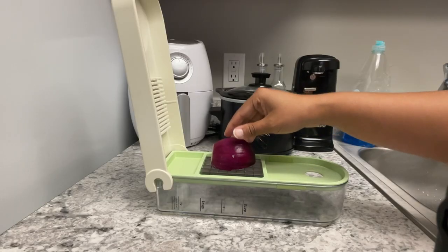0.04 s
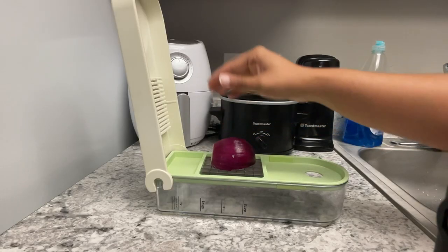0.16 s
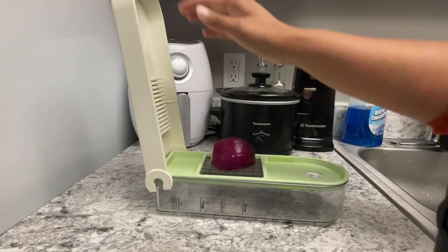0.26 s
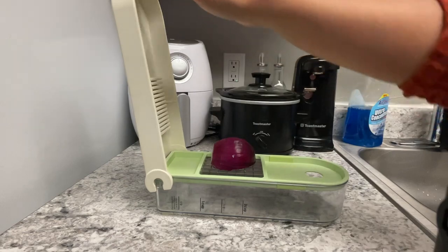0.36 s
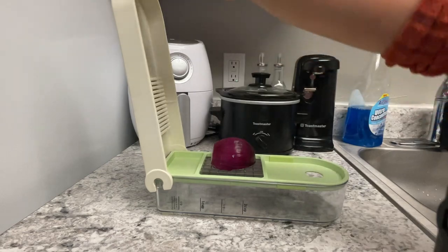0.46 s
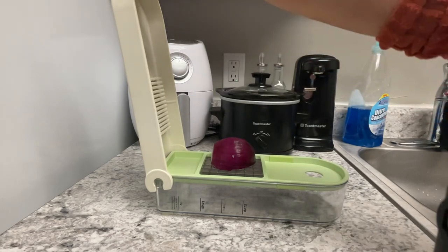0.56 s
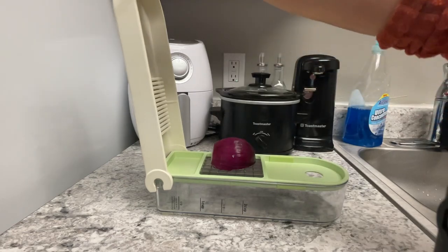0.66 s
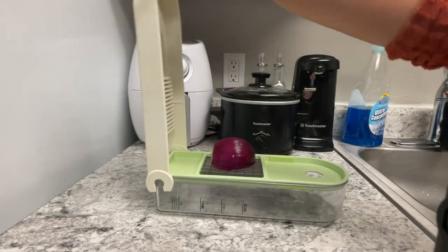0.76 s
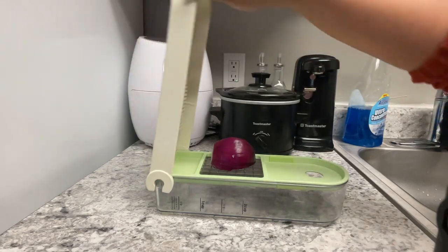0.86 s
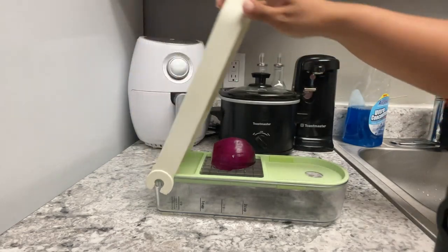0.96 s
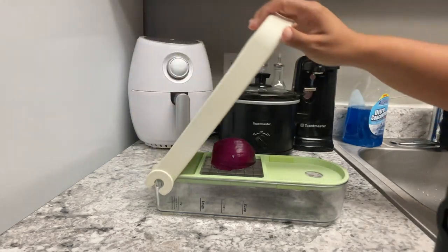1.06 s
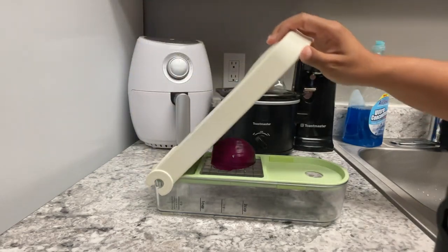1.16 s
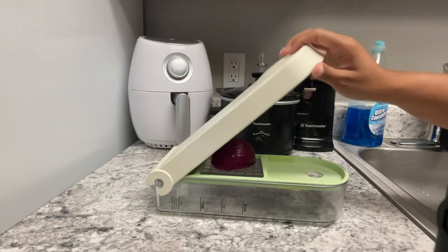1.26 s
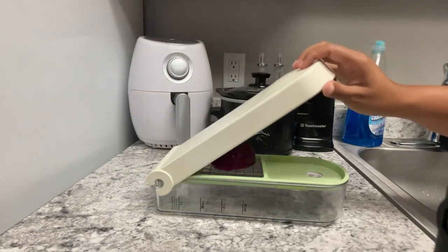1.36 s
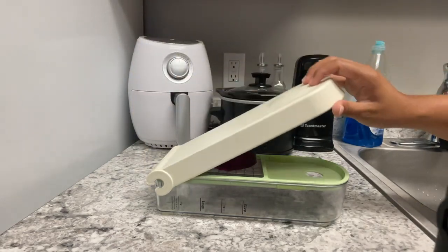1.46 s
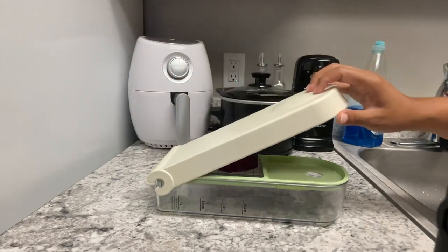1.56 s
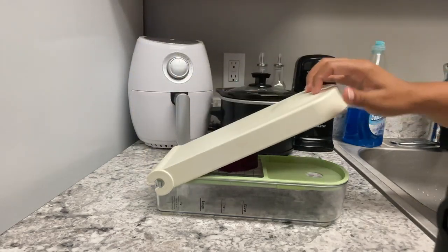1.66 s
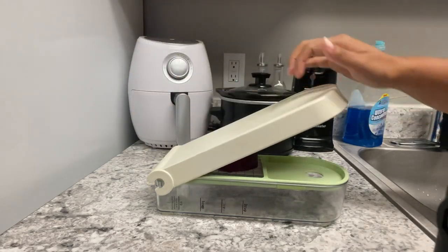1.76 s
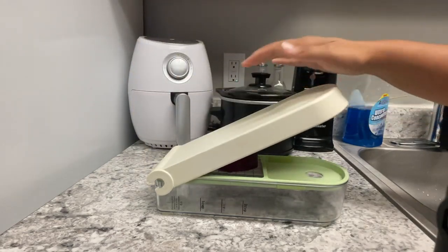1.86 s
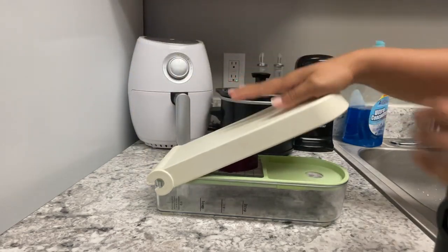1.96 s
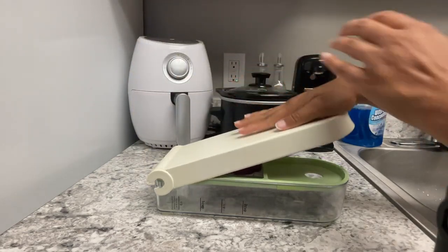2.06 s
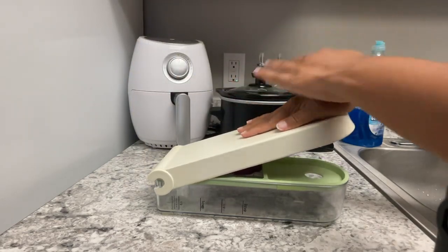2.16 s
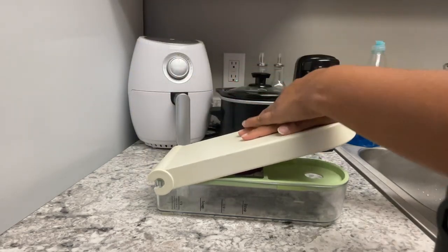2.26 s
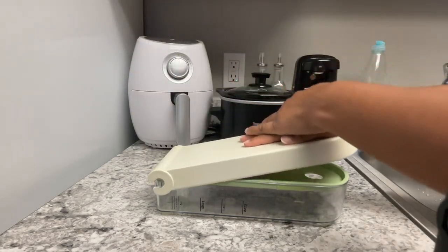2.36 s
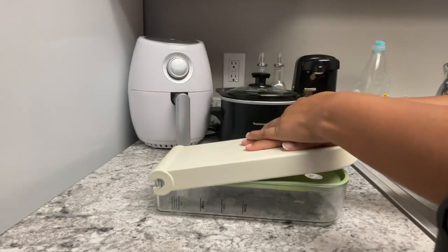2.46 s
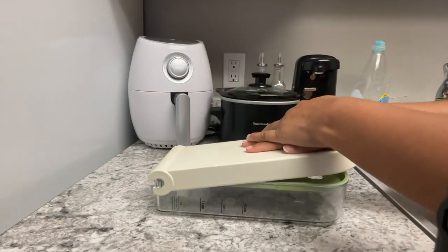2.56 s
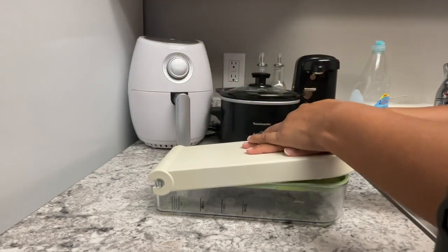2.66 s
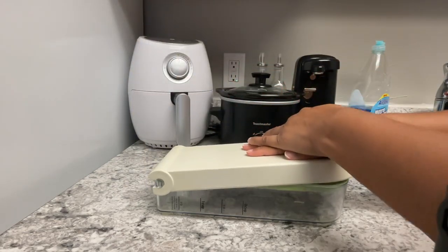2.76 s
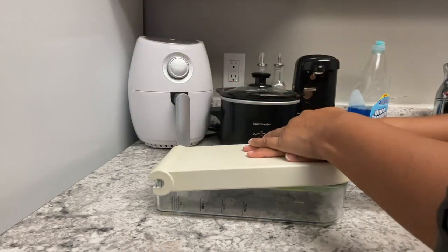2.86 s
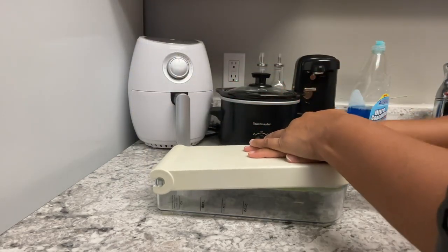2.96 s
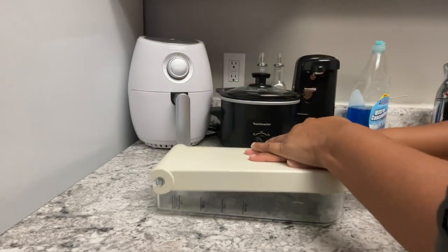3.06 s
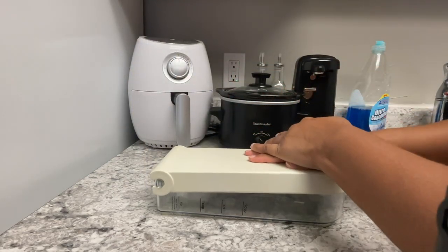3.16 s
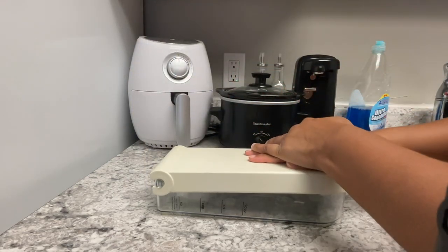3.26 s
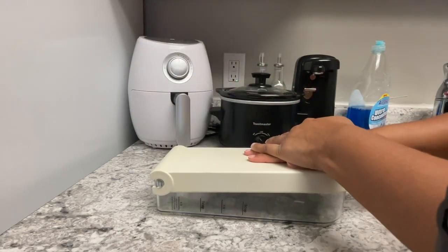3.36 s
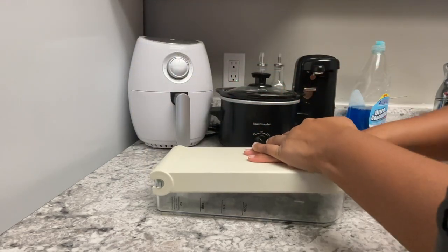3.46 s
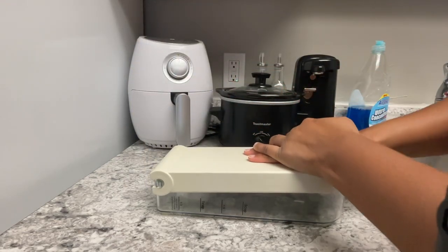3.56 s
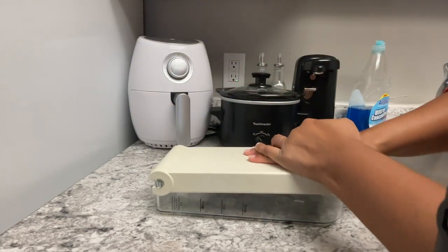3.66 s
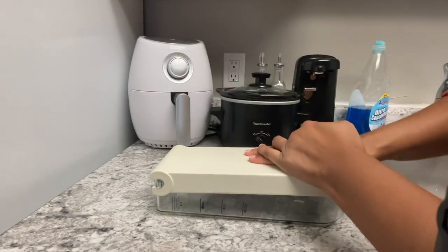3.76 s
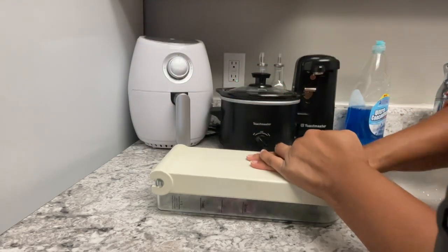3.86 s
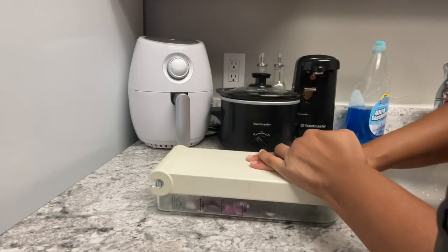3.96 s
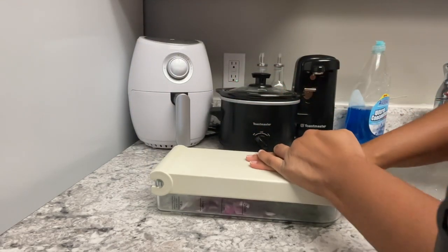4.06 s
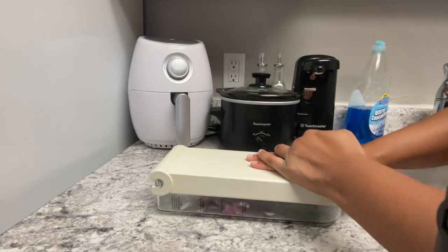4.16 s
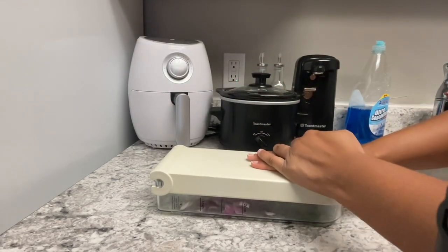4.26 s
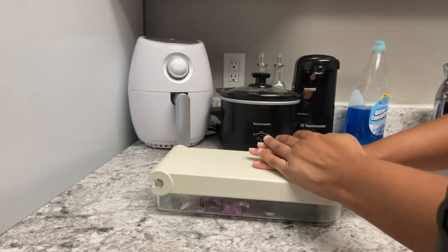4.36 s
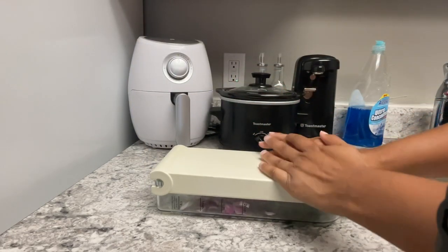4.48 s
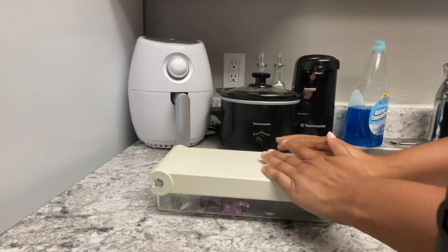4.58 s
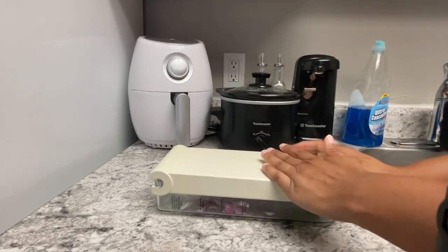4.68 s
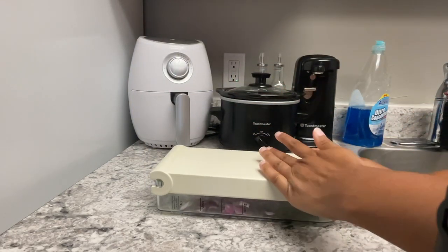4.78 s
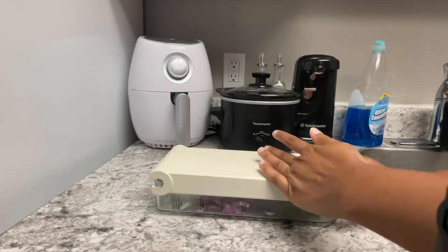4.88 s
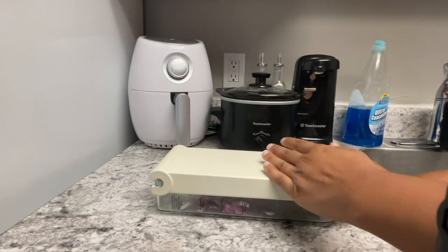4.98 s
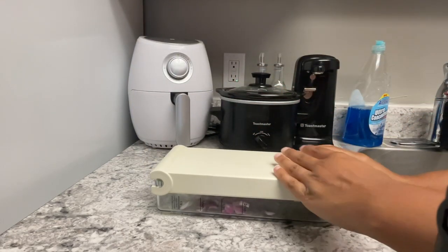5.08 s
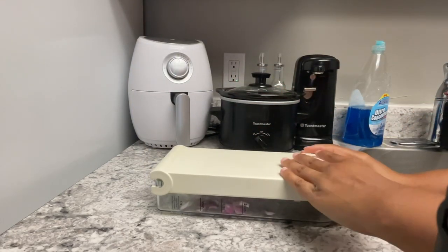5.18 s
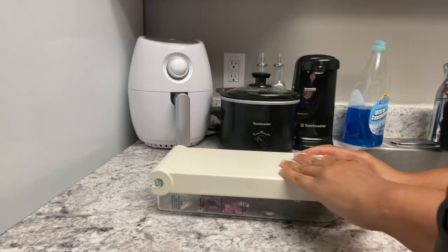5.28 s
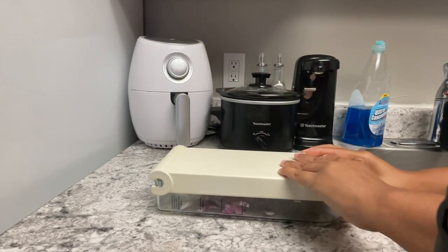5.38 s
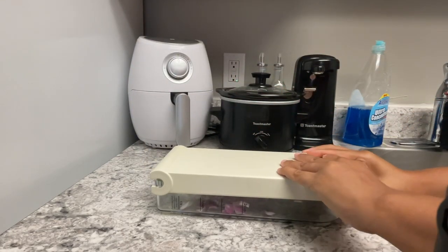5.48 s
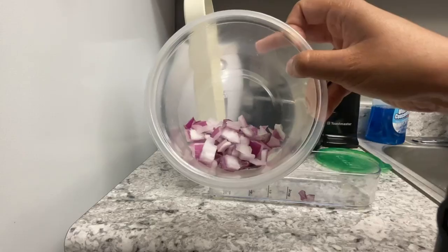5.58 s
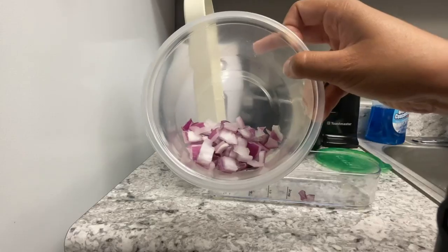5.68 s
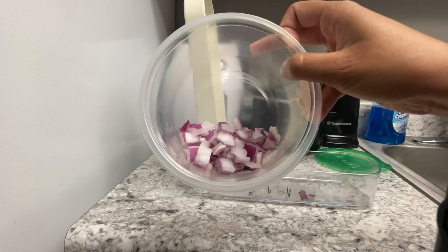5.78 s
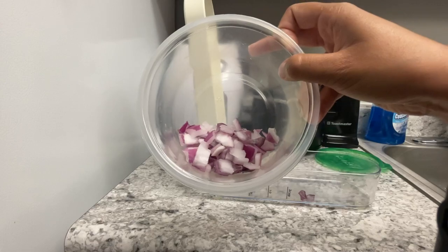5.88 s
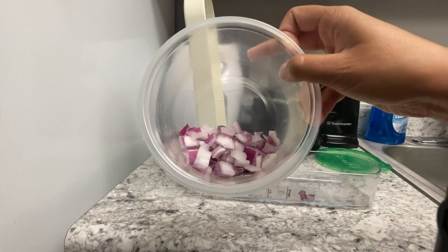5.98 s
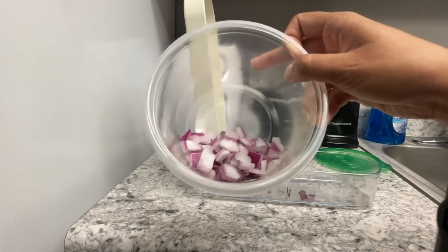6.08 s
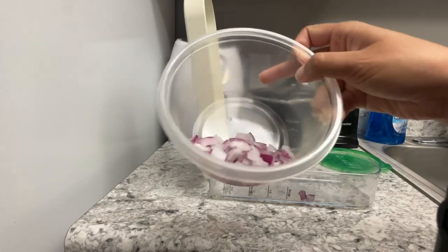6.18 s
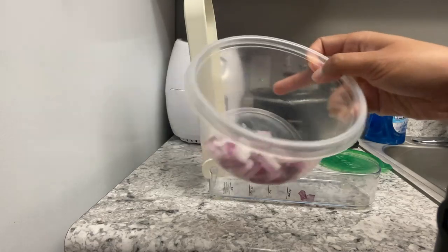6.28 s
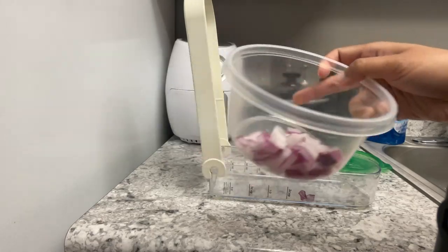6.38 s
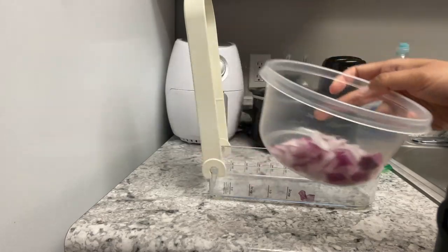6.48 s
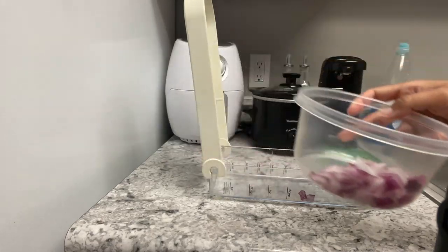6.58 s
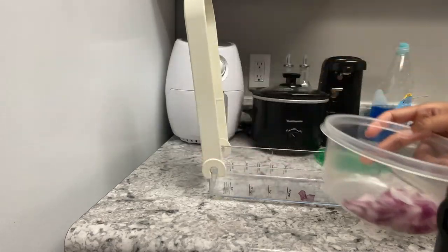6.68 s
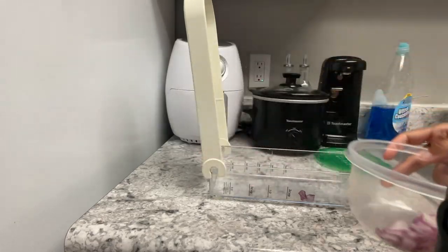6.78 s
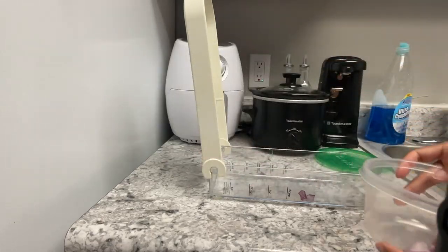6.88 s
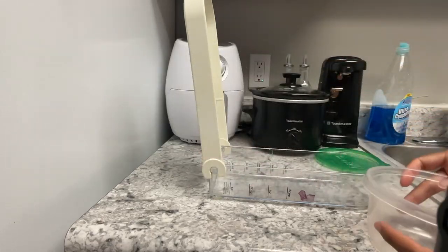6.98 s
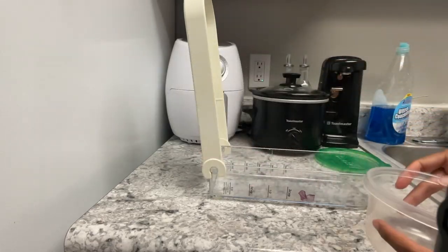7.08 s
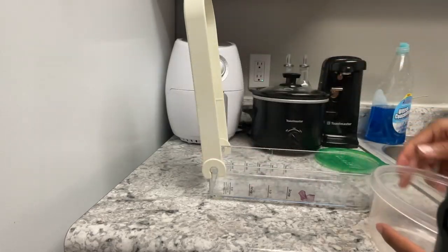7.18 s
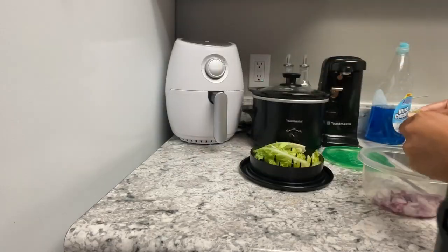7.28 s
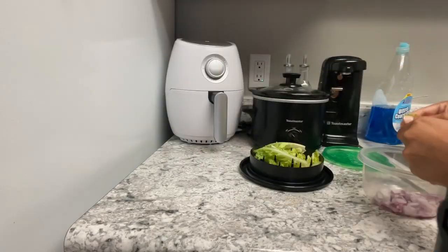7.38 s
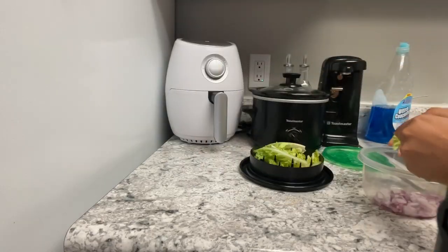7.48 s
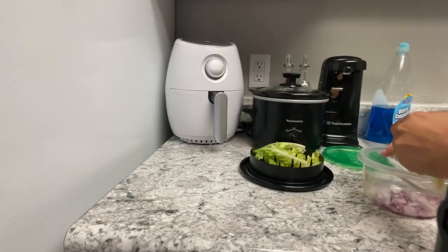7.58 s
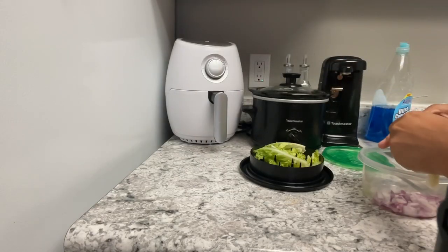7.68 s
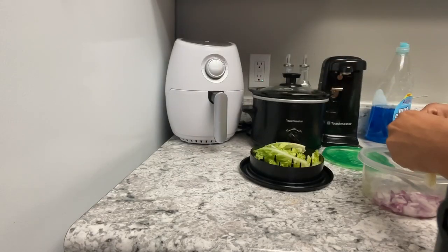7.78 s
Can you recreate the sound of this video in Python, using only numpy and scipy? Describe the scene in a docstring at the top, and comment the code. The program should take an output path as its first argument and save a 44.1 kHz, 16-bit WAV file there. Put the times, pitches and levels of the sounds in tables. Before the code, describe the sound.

In a small hard-surfaced kitchen, a low appliance hum throbs slightly to the left. Close to the microphone, a plastic lid rattles and knocks on its hinge, then presses an onion through blades with wet crunches, snaps and hollow groans. It bangs down, then a second push ends in a louder slam. Hands slide, diced pieces tumble and rustle softly, and the sound cuts out briefly twice.

```python
"""First a low appliance hum beats on the left, over dull kitchen air; a thin whine comes and goes.
Close up on the counter, a plastic chopper's lid swings and knocks, an onion tears layer by layer in its
blade grid, and the lid slams home with a thump. Hands slide off the lid and pieces rustle in a tub.
Motors are sines and wavering tones; contacts ring plastic modes and noise; movements are shaped noise
or streams of tiny contacts; hard kitchen surfaces return a tail. The sound drops out briefly twice."""
import sys
import numpy as np
from scipy import signal
from scipy.io import wavfile
from scipy.ndimage import uniform_filter1d

SR = 44100
rng = np.random.default_rng(int(sys.argv[2]) if len(sys.argv) > 2 else 0)


def output_pcm(signal):
    """Save a mono or channel-first signal as 16-bit PCM at the path in sys.argv[1].

    Samples are clipped to [-1, 1] before scaling.
    """
    pcm = np.clip(np.atleast_2d(signal).T, -1, 1) * 32767
    wavfile.write(sys.argv[1], SR, np.round(pcm).astype(np.int16))


N = 345303
TIME = np.arange(N) / SR
RING = TIME[:SR // 4]   # time axis of one contact
ATTACK = SR // 40   # samples over which a contact's level is set

# Table levels are relative: the functions add their own trims, stereo lean and room.
# Room air: pitch_hz [Hz], density_db [dB per Hz]
AIR_SPECTRUM = [(25, -37), (60, -13.5), (85, -8.5), (120, -22.5), (200, -12), (400, -16), (620, -24),
                (900, -26), (1600, -32.5), (2400, -44), (3500, -56), (6000, -56), (10000, -64.5),
                (14000, -79)]
# Wavering motor tones, each spread over a width: pitch_hz [Hz], level_db [dB], width_hz [Hz]
MOTOR_TONES = [(54.8, -60, 5.3), (210.7, -64, 5.5), (250.4, -62.5, 3.1), (344.6, -63, 9.9),
               (373.5, -63.5, 16), (491.6, -64.5, 5.5), (757, -66.5, 19), (934, -68, 24), (1174, -67, 22),
               (9400, -93.5, 120)]
# Rise and fall of the thin electrical whine: time_s [s], level_db [dB]
WHINE_LEVEL = [(0, -100), (1.1, -92), (1.25, -83.5), (1.9, -81), (4.8, -83.5), (5.5, -84), (5.6, -97),
               (7.83, -99)]
# Partials of the whine: pitch_hz [Hz], level_db [dB], waver_hz [Hz]
WHINE_PARTIALS = [(5394, -0.5, 8), (6815, -11.5, 10)]
# Likeness of the two sides: pitch_hz [Hz], correlation [-1 to 1]
SIDE_LIKENESS = [(60, 0.79), (130, 0.52), (250, 1), (500, -0.59), (1000, 0.72), (2500, -0.028),
                 (6000, -0.094), (12000, 0.055)]
# Stereo balance: pitch_hz [Hz], left_minus_right_db [dB]
STEREO_LEAN = [(60, 1), (130, 5.5), (300, -1.5), (500, 5.5), (1100, 5), (2200, 3), (4500, 7), (8000, 0.5),
               (13000, -3.5)]
# Kitchen reflections: pitch_hz [Hz], density_db [dB]
ROOM_SPECTRUM = [(50, -3.5), (150, -15.5), (450, 5.5), (1500, 0.5), (5000, -3), (8000, 8), (11000, 7.5),
                 (15000, -4)]
# Decay of the kitchen: pitch_hz [Hz], t60_s [s]
ROOM_DECAY = [(70, 1), (250, 0.4), (1000, 0.3), (5000, 0.42), (8000, 0.24), (11000, 0.15), (14000, 0.28)]
# Moments without sound: start_s [s], end_s [s]
DROPOUTS = [(5.532, 5.583), (7.192, 7.243)]

# Modes of counter, box and lid: pitch_hz [Hz], level_db [dB], t60_s [s]
BOX_MODES = [(73.27, 3.5, 0.047), (99.7, -2, 0.22), (139, -3.5, 0.16), (228.3, 3.5, 0.11), (303, 3.5, 0.21),
             (335.2, -1, 0.13), (440.6, -6, 0.033), (515, -5, 0.028), (663, -16, 0.29), (794, -9.5, 0.082),
             (1050, 4.5, 0.011), (1235.5, -8.5, 0.034), (1612, -5, .06), (1920, -7.5, 0.033),
             (2103, -15.5, 0.05), (2444, -10.5, 0.069)]
# Dense overtones of the plastic: pitch_hz [Hz], density_db [dB per Hz]
PLASTIC_SPECTRUM = [(40, -18), (100, -4), (300, 2.5), (470, -1.5), (750, -6.5), (1000, -1), (1400, -5),
                    (1950, -7), (2700, -2.5), (3600, -12), (5800, -9.5), (8000, -18), (12000, -8),
                    (15500, -32)]
# Decay of those overtones: pitch_hz [Hz], t60_s [s]
PLASTIC_DECAY = [(80, 0.25), (400, 0.091), (1500, 0.02), (5000, 0.04), (13000, 0.029)]
# Modes of the hollow container, before damping: pitch_hz [Hz], level_db [dB], t60_s [s]
CONTAINER_MODES = [(347.3, -12.5, 0.088), (457.4, 2, 0.045), (811, -4, 0.05), (1150, -14, 0.026),
                   (1590, -10.5, 0.025), (2400, -20, 0.02)]
# Modes of the worktop, before damping: pitch_hz [Hz], level_db [dB], t60_s [s]
WORKTOP_MODES = [(76, -6, 0.088), (92, -2, 0.099), (127, -3, 0.25), (146, -2, 0.24), (232, 5.5, 0.17),
                 (303, -6.5, 0.26), (344, 5, 0.086), (498, -10.5, 0.42)]
# Air and wall notes of the container: pitch_hz [Hz], boost_db [dB], sharpness_q [Q]
HOLLOW_NOTES = [(385, 12.5, 12), (419.7, 14.5, 9.7), (462, 13, 18), (1190, -1, 9.6), (1506, -7, 22),
                (1865, 1, 26)]
# Notes of groups of nearly equal blades: pitch_hz [Hz], level_db [dB]
BLADE_NOTES = [(805, -1), (1230, -4.5), (1320, -1.5), (1415, 0.5), (1580, -2.5), (1690, 0), (1900, 5),
               (2115, -4.5), (2420, -0.5), (2850, -8), (3350, -13)]
# Bands of thump, box, shell and crack, in that order: low_hz [Hz], high_hz [Hz]
ZONE_BANDS = [(45, 260), (270, 620), (620, 2400), (2400, 16000)]

# Sliding hiss and wet ticks: pitch_hz [Hz], density_db [dB per Hz]
RUSTLE_SPECTRUM = [(1650, 3.5), (2800, -3), (4510, 1), (5230, -2), (8920, -3), (11700, -13), (14000, -7)]
# Skin and onion sliding on plastic: peak_s [s], level_db [dB], rise_s [s], fall_s [s]
SLIDE_STROKES = [(0.72, -66.5, 0.16, 0.19), (0.95, -65, 0.19, 0.22), (1.525, -52, 0.075, 0.04),
                 (3.111, -45.5, .05, 0.22), (3.35, -74, 0.22, 0.76), (3.741, -44.5, 0.13, 0.3),
                 (4.06, -58, 0.23, 0.12), (4.489, -50.5, 0.14, 0.21), (4.65, -69, 0.18, 0.21),
                 (4.77, -72, 0.16, 0.044), (4.97, -75.5, 0.062, 0.57), (6.37, -69.5, 0.069, 0.11),
                 (6.46, -73, 0.063, 0.11), (7.125, -55.5, 0.11, 0.046), (7.247, -44.5, 0.025, 0.088),
                 (7.55, -67, 1.3, 4.7)]
# Small wet ticks of onion pieces: start_s [s], level_db [dB]
WET_TICKS = [(1.535, -29.5), (3.268, -33.5), (3.32, -32), (3.482, -31), (4.151, -33), (6.95, -40),
             (7.0425, -36.5), (7.2435, -33.5), (7.2622, -23), (7.46, -42), (7.6, -38.5), (7.787, -43)]
# Faint fingers on plastic: peak_s [s], level_db [dB], rise_s [s], fall_s [s], pitch_hz [Hz]
FINGER_SQUEAKS = [(0.5, -85, 0.12, 0.3, 7400), (0.6, -72.5, 0.15, 0.5, 5280),
                  (6.38, -79.5, 0.06, 0.06, 6900), (6.43, -80, 0.22, 0.15, 4300)]
# Swing of the hinge: level_db [dB], rise_s [s], fall_s [s]
HINGE_SWING = (-53, 0.28, 0.26)
# Diced onion tumbling into the container: level_db [dB], rise_s [s], fall_s of the thudding [s]
DICE_TUMBLE = (-36.5, 0.35, 0.35)
# Soft taps on the hollow container: start_s [s], level_db [dB]
CONTAINER_TAPS = [(3.485, -33), (3.609, -21.5)]
# Blade grid set rattling by firm knocks: start_s [s], level_db [dB]
GRID_RATTLES = [(0.75, -51.5), (1.48, -45), (3.856, -22), (4.814, -60)]
# Lid knocks: start_s [s], shell level_db [dB], weight_db [dB], crack_to_shell_db [dB], pitch_hz [Hz]
LID_KNOCKS = [(0.664, -51.5, 6, -13, 650), (0.737, -41, -10, -45, 900), (0.749, -33, -1, -28.5, 660),
              (0.867, -48.5, -1, -49, 766), (1.003, -46.5, -7, -53, 930), (1.407, -45, -2, -53, 920),
              (1.478, -33, -2, -23, 880), (2.226, -39, -21, -13.5, 626), (3.088, -20, 6, -25, 901),
              (3.853, -18, 2.5, -3, 1980), (3.863, -19.5, 1, -4, 1610), (4.812, -41, -1, -31, 1840)]
# A landing hand or a stopped lid thuds the box: start_s [s], level_db [dB], lowest_hz shaken [Hz]
BOX_THUDS = [(2.054, -32.5, 83), (2.313, -31.5, 111), (3.097, -16, 125), (3.862, -19, 80)]
# The chopper driven into the counter: start_s [s], level_db [dB], lowest_hz shaken [Hz]
COUNTER_SLAMS = [(3.092, -9.5, 128.7), (3.856, -6.5, 62)]
# First, slow push through the grid: time_s [s], crunch_db [dB], juice_spray_db [dB]
SLOW_PUSH = [(1.97, -57, -54), (2.026, -32.5, -36.5), (2.184, -74, -71), (2.234, -38, -41),
             (2.28, -41.5, -51), (2.29, -44, -31), (2.308, -36, -41.5), (2.388, -27, -31),
             (2.488, -50.5, -50.5), (2.536, -31, -37.5), (2.706, -44, -41.5), (2.714, -28, -31),
             (2.872, -45.5, -43), (2.954, -43.5, -41), (2.964, -29.5, -42), (3.008, -35, -36.5),
             (3.04, -24, -33), (3.06, -22.5, -25), (3.078, -20.5, -27), (3.084, -31.5, -41),
             (3.1, -26.5, -55)]
# Second push, driving the rest through: time_s [s], crunch_db [dB], juice_spray_db [dB]
FINAL_PUSH = [(3.7, -51, -63), (3.82, -44, -52), (3.83, -32.5, -27.5), (3.84, -30.5, -30),
              (3.858, -11, -14.5)]
# Pitch range of single fibres snapping: low_hz [Hz], high_hz [Hz]
FIBRE_RANGE = (842, 4500)
# Container groans: peak_s [s], level_db [dB], rise_s [s], fall_s [s], pitch_hz [Hz]
CONTAINER_GROANS = [(2.373, -19.5, 0.022, 0.094, 437), (2.404, -25, 0.013, 0.058, 456),
                    (2.535, -27.5, 0.018, 0.067, 400), (2.572, -28, 0.05, 0.11, 420),
                    (2.772, -25, 0.08, 0.077, 391), (2.97, -27.5, 0.022, 0.11, 350),
                    (3.07, -22, 0.062, 0.075, 454)]
# Band of the groans: low_hz [Hz], high_hz [Hz]
GROAN_BAND = (320, 560)
# Onion layers tearing, and a last onion piece dropping with a thin tick at 4.07 s:
# start_s [s], snap level_db [dB], boom_to_snap_db [dB], crack_to_snap_db [dB], pitch_hz [Hz]
TEARS_AND_DROP = [(1.985, -45, 11, 0, 930), (2.023, -41, 12.5, 3, 2430), (2.288, -21, -9.5, -10.5, 990),
                  (2.36, -23, 8, -4.5, 1070), (2.387, -20.5, 2, -13, 800), (2.524, -28.5, 1, -9, 1950),
                  (2.599, -31.5, -6, -5, 1920), (2.631, -24, -4.5, -22, 1150),
                  (2.661, -40, -31, -1.5, 1900), (2.671, -30.5, -25, -3, 3080), (2.698, -33, -16, -8, 1230),
                  (2.714, -19, -16, -14, 1170), (2.769, -28.5, 1, -6, 1170), (2.962, -22, -7, -19, 1250),
                  (2.981, -30, -21.5, 4, 3500), (3.041, -30, -10, -2, 2000), (3.059, -17, -7, -15, 1450),
                  (3.074, -20.5, -3, -9, 1230), (3.831, -30, -14.5, -3.5, 1860),
                  (4.07, -40, 1.5, -5.5, 3260)]

# Half-octave filter bank, and the four zones of the box
EDGES = 22 * 2 ** np.arange(0, 9.6, .5)
BANK = [signal.butter(2, pair, "band", fs=SR, output="sos") for pair in zip(EDGES, EDGES[1:])]
ZONES = [signal.butter(order, pair, "band", fs=SR, output="sos")
         for order, pair in zip((2, 2, 5, 5), ZONE_BANDS)]


def from_db(db):
    """Decibels to gain."""
    return 10 ** (np.asarray(db) / 20)


def rms(x):
    """Root mean square."""
    return np.sqrt(np.mean(x ** 2) + 1e-24)


def decay(t, t60_s):
    """Gain that falls evenly by 60 dB in t60_s."""
    return from_db(-60 * t / t60_s)


def at_hz(points, hz):
    """Read a table on a log-frequency axis."""
    f, value = np.transpose(points)
    return np.interp(np.log(hz), np.log(f), value)


def level(spans, column):
    """Gain in time from dB curves, fading to silence outside them."""
    gain = 0
    for rows in spans:
        rows = np.array(rows)
        gain = gain + from_db(np.interp(TIME, rows[:, 0], rows[:, column], left=-150, right=-150))
    return np.abs(uniform_filter1d(uniform_filter1d(gain, size=130), size=130))


def stroke(peak_s, peak_db, rise_s, fall_s, range_db=20):
    """Gain of a movement: range_db up in rise_s, the same down in fall_s, both evenly in dB."""
    away = np.maximum((peak_s - TIME) / rise_s, (TIME - peak_s) / fall_s)
    return from_db(peak_db - range_db * np.minimum(away, 10))


def add(out, start_s, sound):
    """Mix a stereo sound in at a time."""
    i = round(start_s * SR)
    out[:, i:i + sound.shape[1]] += sound[:, :N - i]


def lean(hz):
    """Left and right gain at a frequency."""
    return from_db(at_hz(STEREO_LEAN, hz) * np.array([[.5], [-.5]]))


def highpass(x, hz):
    """Steep cut of the lows."""
    return signal.sosfilt(signal.butter(4, hz, "high", fs=SR, output="sos"), x)


def lowpass(x, hz, order=2):
    """Cut of the highs, gentle at a low order."""
    return signal.sosfilt(signal.butter(order, hz, fs=SR, output="sos"), x)


def favour(x, hz, q, boost_db):
    """The point of contact brings out the modes near one pitch."""
    b, a = signal.iirpeak(hz, q, fs=SR)
    return x + from_db(boost_db) * signal.lfilter(b, a, x)


def drift(rate_hz):
    """Slow random wander of spread 1, drawn at every 40th sample."""
    r = np.exp(-80 * np.pi * rate_hz / SR)
    slow = signal.lfilter([1], [1, -2 * r, r * r], rng.standard_normal(N // 40 + 2002))
    slow = slow[2000:]   # skip the filter's start
    return np.interp(np.arange(N) / 40, np.arange(len(slow)), slow / rms(slow))


def tone(hz, width_hz):
    """A wavering tone, spread over a width by slow random wander of its two phases."""
    turn = 2 * np.pi * hz * TIME
    return lean(hz) * (drift(width_hz / 2) * np.cos(turn) + drift(width_hz / 2) * np.sin(turn))


def noise(spectrum, t, t60=None):
    """Stereo noise in half-octave bands; with a t60 table each band dies at its own pace."""
    out, white = 0, rng.standard_normal((2, 2, len(t)))
    for k, hz in enumerate(np.sqrt(EDGES[1:] * EDGES[:-1])):
        mid, side = signal.sosfilt(BANK[k], white[k % 2])
        alike = at_hz(SIDE_LIKENESS, hz)
        gain = from_db(at_hz(spectrum, hz)) * lean(hz)
        if t60:
            gain = gain * decay(t, at_hz(t60, hz))
        out = out + gain * (np.sqrt(1 + alike) * mid + np.sqrt(1 - alike) * side * [[1], [-1]])
    return out


def grains(per_s, spread_db, size):
    """Random clicks of both signs, a few much larger than the rest."""
    born = rng.random(size) < per_s / SR
    return born * rng.choice([-1, 1], size) * from_db(spread_db * np.minimum(rng.exponential(1, size), 4))


def chopper(modes_db=-19, scatter_db=4.0, ear_phase=0.71):
    """One touch rings the box: clear modes, each with a strength of its own, amid dense overtones."""
    out = noise(PLASTIC_SPECTRUM, RING, PLASTIC_DECAY)
    for hz, db, t60_s in BOX_MODES:
        # higher modes reach the two ears less in step
        phase = ear_phase * hz / 500 * rng.standard_normal((2, 1))
        gain = from_db(modes_db + db + rng.normal(0, scatter_db)) * lean(hz)
        out = out + gain * decay(RING, t60_s) * np.sin(2 * np.pi * hz * RING + phase)
    return out


def patter(per_s, spread_db):
    """A stream of tiny contacts at one place on the box."""
    contacts = grains(per_s, spread_db, N)
    return signal.oaconvolve(chopper(modes_db=-22.0), contacts[None], axes=1)[:, :N]


def hollow(x, gap_hz=669, gap_q=2.5, gap_share=0.2):
    """The container picks out a few notes, which beat as they ring, and leaves a gap above its boom."""
    x = x + sum(favour(x, hz, q, boost_db) - x for hz, boost_db, q in HOLLOW_NOTES)
    return x - gap_share * signal.lfilter(*signal.iirpeak(gap_hz, gap_q, fs=SR), x)


def voiced(ring, zone_dbs, shell_top_hz=4200, db_per_octave=28):
    """Where and how hard the box is hit sets the share of thump, box, shell and crack."""
    parts = [signal.sosfilt(zone, ring) for zone in ZONES]
    # a soft contact has little crack, and leaves the upper shell modes quiet too
    top_hz = np.clip(shell_top_hz * 2 ** ((zone_dbs[3] - zone_dbs[2]) / db_per_octave), 800, 12000)
    parts[2] = lowpass(parts[2], top_hz)
    return sum(from_db(db) * part / rms(part[:, :ATTACK]) for db, part in zip(zone_dbs, parts))


def soft_blows(blows, modes, gain_db, damping, softness_hz):
    """A cushioned blow rings a few modes without any crack."""
    out = np.zeros((2, N))
    for start_s, level_db in blows:
        for hz, db, t60_s in modes:
            gain = from_db(level_db + gain_db + db) * lean(hz)
            add(out, start_s, gain * decay(RING, t60_s / damping) * np.sin(2 * np.pi * hz * RING))
    return lowpass(out + 1e-18, softness_hz)   # inaudible offset keeps the filter fast


def appliance(air_db=-49.5, hum_hz=119, hum_db=-52.5, second_hum_db=-59.5):
    """Two motors beat near twice the mains rate, with wavering tones over a dull rush of air."""
    air = noise(AIR_SPECTRUM, TIME)
    turn = 2 * np.pi * hum_hz * TIME
    beat_hz = 1.31 - .032 * TIME   # the motors' difference in pitch slowly closes
    ahead = 2 * np.pi * np.cumsum(beat_hz) / SR
    hum = np.sqrt(2) * (from_db(hum_db) * np.sin(turn) + from_db(second_hum_db) * np.sin(turn + ahead))
    hum = hum * from_db(-5 * (TIME > 7.22))   # the hum is 5 dB fainter from 7.22 s on
    tones = sum(from_db(db) * tone(hz, width_hz) for hz, db, width_hz in MOTOR_TONES)
    return from_db(air_db) * air / rms(air) + hum * lean(hum_hz) + tones


def whine():
    """Two faint high tones, even in strength and barely wavering in pitch, rise and fall together."""
    out = 0
    for hz, db, waver_hz in WHINE_PARTIALS:
        turn = 2 * np.pi * np.cumsum(hz + waver_hz * drift(16)) / SR
        out = out + from_db(db) * lean(hz) * np.sqrt(2) * np.sin(turn)
    return level([WHINE_LEVEL], 1) * out


def kitchen(x, wet_db=-5, onset_s=0.0011):
    """Hard walls and the counter return a diffuse tail, each band dying at its own pace."""
    t = TIME[:SR]
    tail = noise(ROOM_SPECTRUM, t, ROOM_DECAY) * np.clip(t / onset_s - .5, 0, 1)
    tail = tail / np.sqrt(np.sum(tail ** 2) / 2)
    return from_db(wet_db) * signal.oaconvolve(x.mean(axis=0, keepdims=True), tail, axes=1)[:, :N]


def squeak(width_hz=290):
    """Thin whistles of fingers on plastic swell and fade."""
    return sum(stroke(*shape) * tone(hz, width_hz) for *shape, hz in FINGER_SQUEAKS)


def rustle(gain_db=-2, flutter_db=1.5, low_hz=2000, tick_db=-8, tick_t60_s=0.027, tick_rise_s=0.0041):
    """Sliding makes a soft uneven hiss; wet pieces tick as they part or land."""
    hiss = highpass(noise(RUSTLE_SPECTRUM, TIME), low_hz)
    movement = sum(stroke(*slide) for slide in SLIDE_STROKES)
    out = from_db(gain_db + flutter_db * drift(60)) * movement * hiss / rms(hiss)
    shape = (1 - np.exp(-RING / tick_rise_s)) * decay(RING, tick_t60_s)
    for start_s, level_db in WET_TICKS:
        tick = highpass(noise(RUSTLE_SPECTRUM, RING), low_hz)
        add(out, start_s, from_db(level_db + tick_db) * shape * tick / rms(tick))
    return out


def hinge(per_s=700, softness_hz=1400, peak_s=.93):
    """Tiny slips of the hinge ring the lid."""
    ring = signal.sosfilt(ZONES[2], patter(per_s, spread_db=2.0))
    ring = lowpass(ring, softness_hz)
    return stroke(peak_s, *HINGE_SWING) * ring / rms(ring)


def tumble(per_s=400, thud_db=-5.0, thud_hz=150, patter_db=-6, softness_hz=2000, patter_fall_s=0.12):
    """Soft dice land on the container floor; their patter ends before the thudding."""
    peak_s = 4.09
    level_db, rise_s, fall_s = DICE_TUMBLE
    ring = lowpass(patter(per_s, spread_db=2.0), softness_hz)
    thud = lowpass(signal.sosfilt(ZONES[0], ring), thud_hz)
    shell = signal.sosfilt(ZONES[2], hollow(ring))
    return (stroke(peak_s, level_db + thud_db, rise_s, fall_s) * thud / rms(thud)
            + stroke(peak_s, level_db + patter_db, rise_s, patter_fall_s) * shell / rms(shell))


def taps(pat_db=-16, pat_hz=1500, pat_t60_s=0.03, lowest_hz=290):
    """The container wall flexes with a dull pat and gives a short hollow note."""
    out = soft_blows(CONTAINER_TAPS, CONTAINER_MODES, gain_db=-1.5, damping=0.83, softness_hz=1600)
    for start_s, level_db in CONTAINER_TAPS:
        pat = lowpass(noise(PLASTIC_SPECTRUM, RING), pat_hz, order=3)
        add(out, start_s, from_db(level_db + pat_db) * decay(RING, pat_t60_s) * pat / rms(pat))
    return highpass(out, lowest_hz)


def grid(q=35, per_s=900, t60_s=0.29):
    """Steel blades rattle in their frame after a firm knock; their close notes blur into a rough ring."""
    t = TIME[:SR // 2]
    out = np.zeros((2, N))
    for start_s, level_db in GRID_RATTLES:
        ring = 0
        for hz, db in BLADE_NOTES:
            contacts = [grains(per_s, 1.7, len(t)) for _ in range(2)]
            ring = ring + from_db(db) * lean(hz) * signal.lfilter(*signal.iirpeak(hz, q, fs=SR), contacts)
        add(out, start_s, from_db(level_db) * decay(t, t60_s) * ring / rms(ring))
    return out


def knocks(gain_db=-1, lowest_hz=85, thump_hz=240, box_db=-6, box_follows=0.98):
    """The lid bumps on its hinge, on the onion and on the frame; weight behind a blow brings out the lows."""
    out = np.zeros((2, N))
    for start_s, level_db, weight_db, crack_db, clack_hz in LID_KNOCKS:
        ring = highpass(chopper(modes_db=-22.5), lowest_hz)
        ring = favour(ring, thump_hz, q=1, boost_db=6.0)
        ring = favour(ring, clack_hz, q=3.9, boost_db=2.0)
        # less crack, duller contact: an octave lower for every 9 dB, down to 2200 Hz
        ring = lowpass(ring, max(14000 * 2 ** (crack_db / 9), 2200), order=1)
        zone_dbs = [weight_db, box_db + box_follows * weight_db, 0, crack_db]
        add(out, start_s, from_db(level_db + gain_db) * voiced(ring, zone_dbs))
    return out


def thuds(gain_db=-1, thud_hz=105):
    """A landing hand or a stopped lid makes the whole box thud."""
    zone_dbs = [0.5, -4.5, -20, -35]   # thump, box, shell, crack
    out = np.zeros((2, N))
    for start_s, level_db, lowest_hz in BOX_THUDS:
        ring = favour(highpass(chopper(modes_db=-21.0), lowest_hz), thud_hz, q=3.9, boost_db=4.5)
        add(out, start_s, from_db(level_db + gain_db) * voiced(ring, zone_dbs))
    return out


def counter():
    """The lid hitting the frame drives a deep thump into the worktop."""
    out = 0
    for start_s, level_db, lowest_hz in COUNTER_SLAMS:
        thump = soft_blows([(start_s, level_db)], WORKTOP_MODES, gain_db=-9.0, damping=1.5, softness_hz=900)
        out = out + highpass(thump, lowest_hz)
    return out


def groan(per_s=700, gain_db=-2):
    """The blades drag through the flesh in fine slips, which keep the container booming."""
    band = signal.butter(3, GROAN_BAND, "band", fs=SR, output="sos")
    ring = signal.sosfilt(band, hollow(patter(per_s, spread_db=1.5)))
    out = 0
    for *shape, hz in CONTAINER_GROANS:
        note = favour(ring, hz, q=6.2, boost_db=5.5)
        out = out + stroke(*shape) * note / rms(note)
    return from_db(gain_db) * out


def crackle(per_s=420, gain_db=-5, spread_db=3.0, q=11, count=16):
    """In the slow push wet fibres snap at uneven moments and pitches, high ones smaller, in the container."""
    ring = 0
    for hz in np.geomspace(*FIBRE_RANGE, count):
        snaps = grains(per_s / count, spread_db, N) + 1e-18   # inaudible offset keeps the filter fast
        ring = ring + lean(hz) / hz * signal.lfilter(*signal.iirpeak(hz, q, fs=SR), snaps)
    ring = hollow(ring)
    return from_db(gain_db) * level([SLOW_PUSH], 1) * ring / rms(ring)


def cutting(per_s=300, crunch_db=-5.0, spray_db=-1.5, jerk_db=1.0, count=4):
    """Cells burst densely at several places on the blade grid, and the box radiates them."""
    ring = hollow(sum(patter(per_s, spread_db=3.0) for _ in range(count)))
    ring = ring * from_db(jerk_db * drift(57))   # the onion sinks in small jerks
    out = 0
    for column, zone, db in zip((1, 2), ZONES[2:], [crunch_db, spray_db]):
        part = signal.sosfilt(zone, ring)
        out = out + from_db(db) * level([SLOW_PUSH, FINAL_PUSH], column) * part / rms(part)
    return out


def tears_and_drop(gain_db=-6.0, per_s=900, after_db=-19, run_s=0.0035, thump_to_boom_db=-5):
    """A tearing layer, or the last piece dropping, gives one snap and a short run of tiny contacts."""
    out = np.zeros((2, N))
    for start_s, level_db, boom_db, crack_db, snap_hz in TEARS_AND_DROP:
        force = from_db(after_db) * grains(per_s, 7.5, len(RING)) * np.exp(-RING / run_s)
        force[0] = 1   # the first contact
        ring = signal.fftconvolve(chopper(modes_db=-20), force[None], axes=1)[:, :len(RING)]
        ring = favour(highpass(ring, 82), snap_hz, q=9.0, boost_db=9)
        zone_dbs = [boom_db + thump_to_boom_db, boom_db, 0, crack_db]
        add(out, start_s, from_db(level_db + gain_db) * voiced(hollow(ring), zone_dbs))
    return out


def scene(hum_lag_s=0.00031):
    """Chopper and rustle in the kitchen; the hum comes from the left and reaches the right side later."""
    left, right = appliance() + whine()
    background = [left, np.interp(TIME - hum_lag_s, TIME, right)]
    handling = squeak() + rustle() + hinge() + tumble() + taps()
    blows = grid() + knocks() + thuds() + counter()
    onion = groan() + crackle() + cutting() + tears_and_drop()
    near = handling + blows + onion
    return near + kitchen(near) + background


def record(dry, treble_hz=13200, top_hz=16400):
    """The treble falls away, the sound drops out twice, peaks clip at full scale and the top is cut."""
    live = np.ones(N)
    for start_s, end_s in DROPOUTS:
        live[(TIME > start_s) & (TIME < end_s)] = 0
    dull = lowpass(dry, treble_hz, order=10)
    heard = np.clip(dull * uniform_filter1d(live, size=130), -1, 1)
    return signal.sosfilt(signal.cheby2(16, 70, top_hz, fs=SR, output="sos"), heard)


dry = scene()
out = record(dry)
output_pcm(out)
```